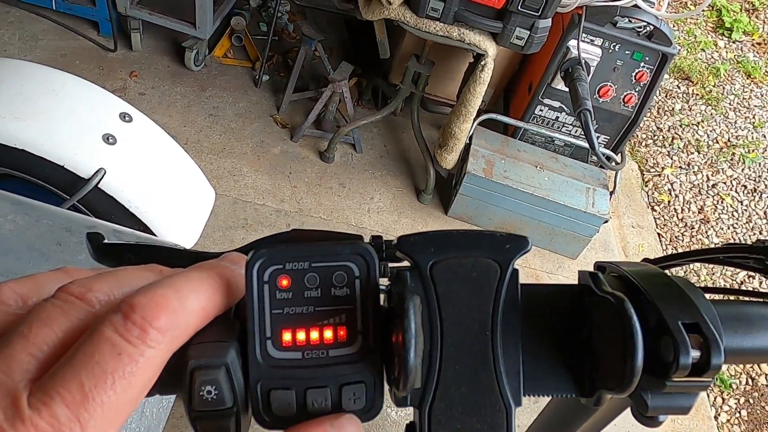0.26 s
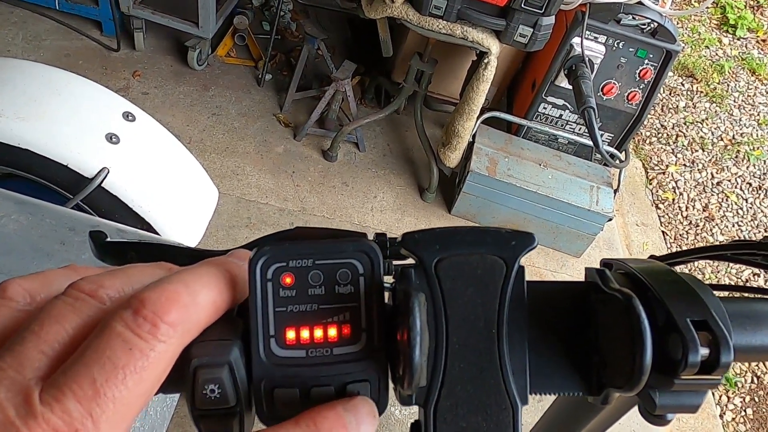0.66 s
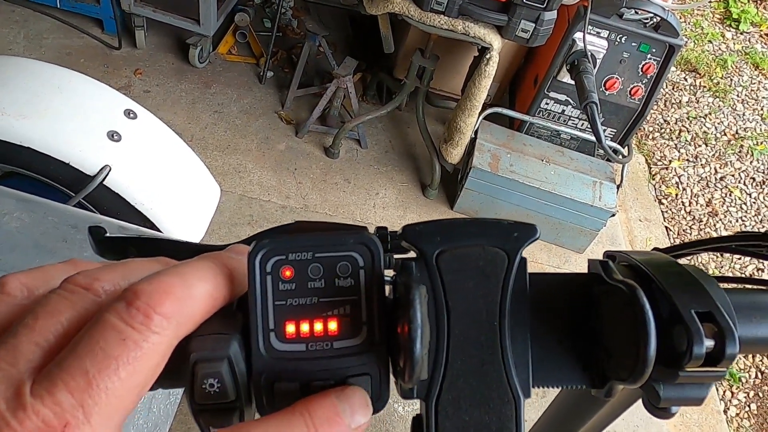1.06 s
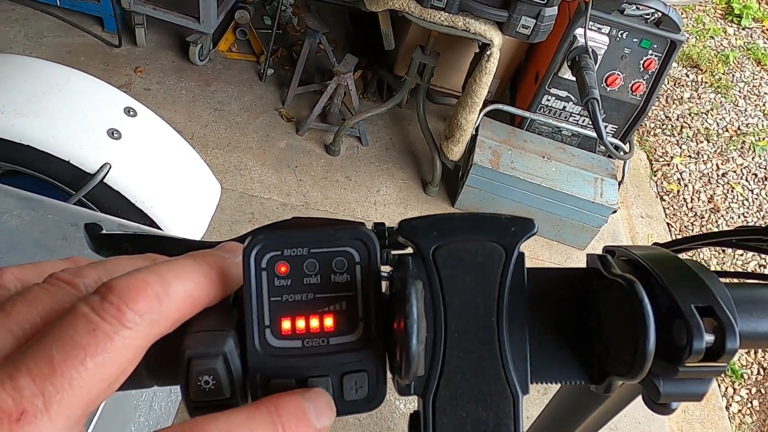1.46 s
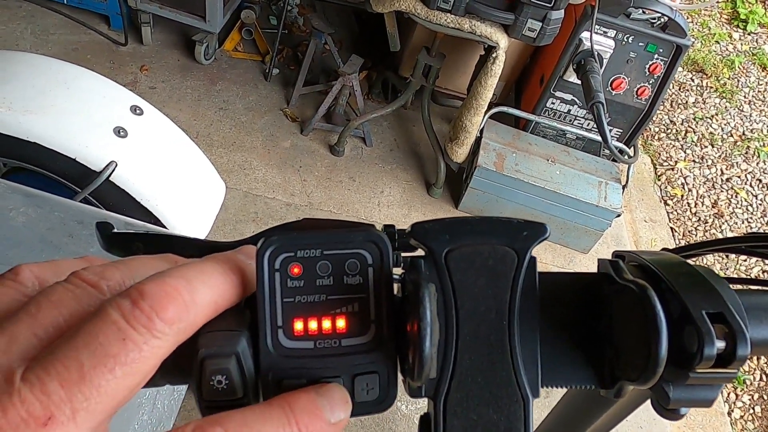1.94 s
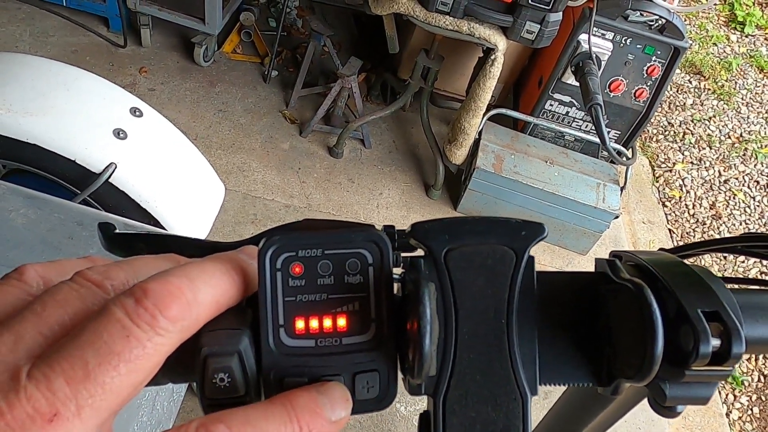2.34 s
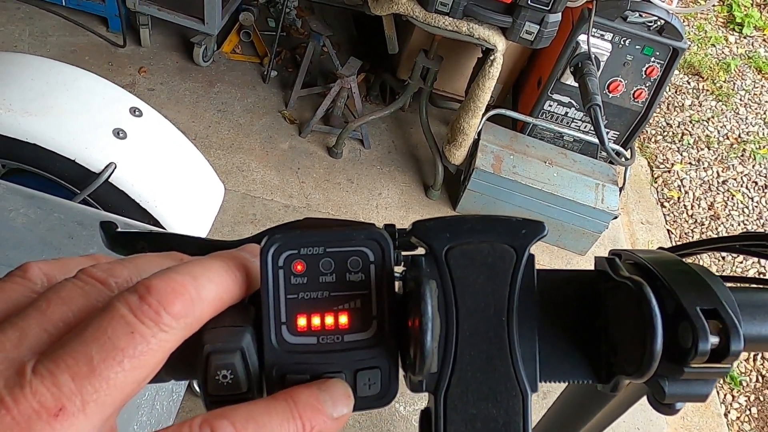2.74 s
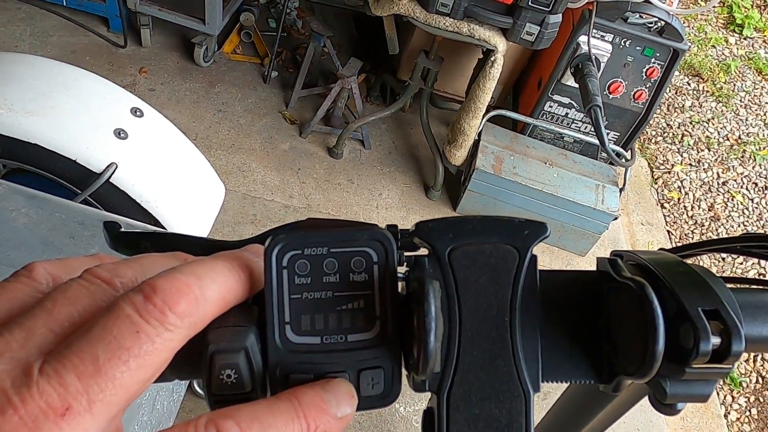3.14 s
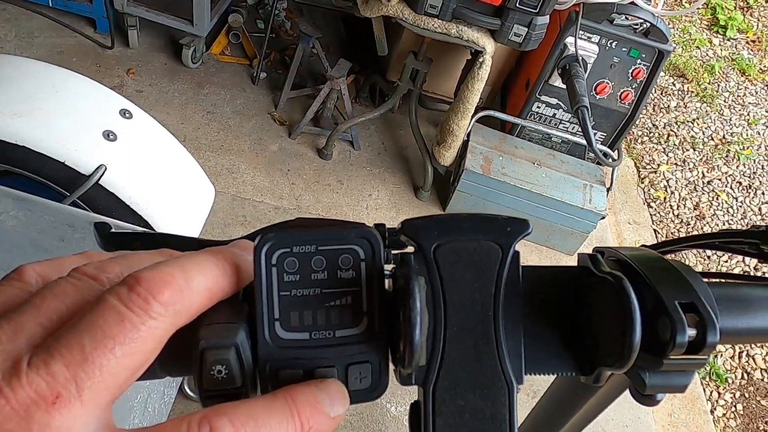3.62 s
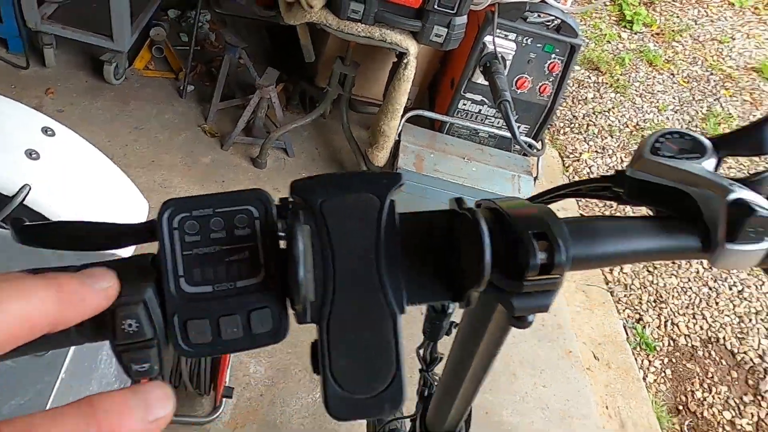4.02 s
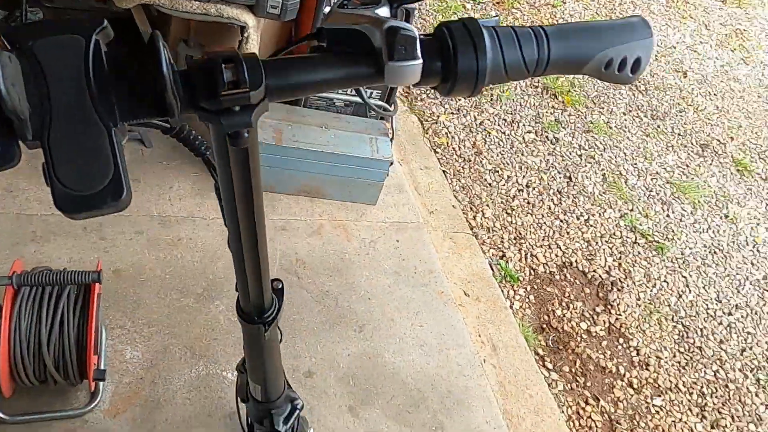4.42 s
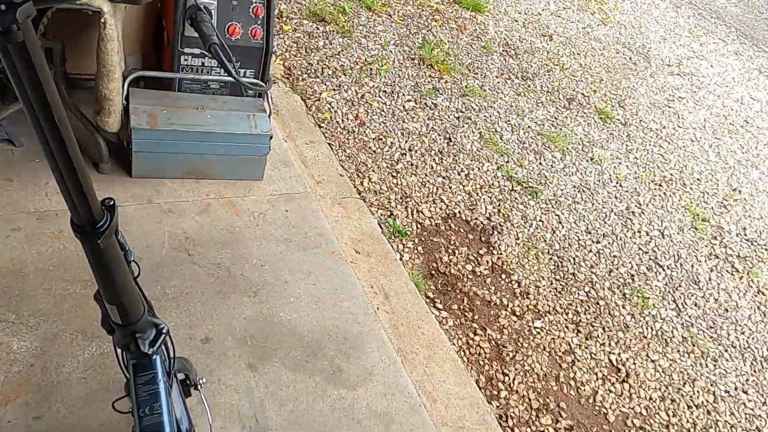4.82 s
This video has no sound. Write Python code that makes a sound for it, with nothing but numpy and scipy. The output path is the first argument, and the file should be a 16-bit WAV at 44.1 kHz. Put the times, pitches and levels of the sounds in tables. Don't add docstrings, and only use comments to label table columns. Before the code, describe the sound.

Close to the microphone in an open garage, a plastic switch snaps crisply at about 1.8 seconds and again at 3.6, each with a tiny hard ring and short room reflection. Small birds cheep, trill and whistle faintly outside throughout, over a low unsteady traffic hum. Near the end come soft rustling, tiny taps and louder chirps.

```python
import sys
import numpy as np
from scipy import signal
from scipy.fft import rfft, irfft
from scipy.io import wavfile
from scipy.ndimage import uniform_filter1d

SR = 44100
rng = np.random.default_rng(int(sys.argv[2]) if len(sys.argv) > 2 else 0)


def magnitude_from_level(level_db):
    exponent = np.asarray(level_db, float) / 20
    return 10 ** exponent


def store_wav(level_fs):
    pcm = np.round(np.clip(np.atleast_2d(level_fs), -1, 1) * 32767)
    wavfile.write(sys.argv[1], SR, pcm.T.astype(np.int16))


N = 223313
T = np.arange(N) / SR
HZ = np.maximum(np.arange(N // 2 + 1) * SR / N, 1)


def on_log(table):
    hz, value = np.transpose(table)
    return np.interp(np.log(HZ), np.log(hz), value)


def shaped(gain):
    return irfft(rfft(rng.standard_normal(N)) * gain, N)


def unit(x):
    return x / np.sqrt(np.mean(x ** 2))


def walk(rate_hz):
    k = int(SR / rate_hz)
    steps = np.repeat(rng.standard_normal(N // k + 1), k)
    return 1.9 * uniform_filter1d(uniform_filter1d(steps, k), k)[:N]


def echoes(x, t60_s, gap_s, treble_share):
    t = np.arange(SR // 2) / SR
    noise = rng.standard_normal((2, len(t))) + 0.6 * rng.standard_normal(len(t))
    low = signal.sosfilt(signal.butter(2, 6000, fs=SR, output="sos"), noise)
    tail = low * 1000 ** (-t / t60_s) + (noise - low) * 1000 ** (-t / t60_s / treble_share)
    tail = tail * np.clip(t / gap_s, 0, 1)
    tail = tail / np.sqrt(np.mean(np.sum(tail ** 2, axis=1)))
    return signal.fftconvolve(x[None], tail, axes=1)[:, :N]


# (pitch_hz, level_db)
LEFT_SHADE = [(300, -10), (2000, 14.5), (4000, 2), (8000, 4.5), (12000, -20)]


def ports(x, pan_db):
    lag_samples = 2 * np.clip((8600 - HZ) / 1600, 0, 1)
    late = np.exp(-2j * np.pi * HZ / SR * lag_samples)
    left = irfft(rfft(x) * late * magnitude_from_level(on_log(LEFT_SHADE) + pan_db / 2), N)
    return np.array([left, x * magnitude_from_level(-pan_db / 2)])


# (pitch_hz, press_db, release_db, t60_s)
BUTTON = [(1160, -17.5, -14.5, 0.04), (1150, -39, -38, .2), (1330, -27, -30, .02),
          (1740, -21.5, -30, 0.027), (2078, -17.5, -37, 0.019), (3330, -15.5, -10, 0.017),
          (3900, -36, -15, 0.015), (4730, -10, -11, 0.026), (5200, -12, -13, .014), (2750, -6, 0.5, 0.0047),
          (3700, -8, 5, 0.0055), (4900, -5, 7, 0.006), (6100, 14.5, 7.5, 0.0023), (8420, 10, -22, 0.0022),
          (10200, -12, -28, .003), (12500, -22, -34, .003), (14500, -15, -32, 0.0023)]
# (start_s, peak_db, release_0_to_1, left_minus_right_db, ring_share_of_t60)
SNAPS = [(1.7712, -14.5, 0, -6, 1), (3.5985, -49, 0.75, 1, 0.5), (3.609, -15, 1, -7, 1.1),
         (3.6095, -18.5, .9, -7, 1), (3.6114, -30, 1, 3, 1), (4.189, -41, 0.5, 1, .7),
         (4.1915, -43, 0.8, 1, .7), (4.1943, -32, .8, -4, 0.5), (4.203, -38, .7, -3, 0.5),
         (4.2145, -47, .7, 0, .5), (4.5055, -44, 0.5, 1, 1), (4.8055, -52, .4, 0, .5)]


def button():
    dome_flip_s, dome_spread_s = 0.00026, 0.00027
    light_tap_db, light_tap_hz = 13, 2000
    out, t = np.zeros((2, N)), np.arange(SR // 10) / SR
    hz, press_db, release_db, t60_s = (column[:, None] for column in np.transpose(BUTTON))
    late = np.maximum(t - dome_spread_s * np.log2(hz / hz.min()), 0)
    rise = 1 - np.exp(-(late / dome_flip_s) ** 2)
    small_body = signal.butter(2, 855, "high", fs=SR, output="sos")
    for s, db, release, pan_db, ring in SNAPS:
        mode_db = press_db + release * (release_db - press_db)
        mode_db = mode_db - light_tap_db * max(1 - ring, 0) * (hz < light_tap_hz)
        modes = magnitude_from_level(mode_db) * np.sin(2 * np.pi * hz * late) * 1000 ** (-late / t60_s / ring)
        snap = signal.sosfilt(small_body, -(modes * rise).sum(axis=0))
        if release > .85:
            snap = -snap
        hit, first = np.zeros(N), int(s * SR)
        hit[first:first + len(t)] = snap * magnitude_from_level(db) / np.abs(snap).max()
        out += ports(hit, pan_db)
    return out + magnitude_from_level(-15.5) * echoes(out.mean(axis=0), t60_s=0.27, gap_s=0.0069, treble_share=0.25)


# (start_s, pitch_hz, level_db, t60_s)
THUMPS = [
    (3.6317, 320, -26.5, 0.016),
    (5.014, 417, -42, 0.02),
    (5.031, 289, -42.5, 0.05),
]


def knocks():
    out = np.zeros((2, N))
    for s, hz, db, t60_s in THUMPS:
        late = np.maximum(T - s, 0)
        push = 1 - np.exp(-late / .0015)
        out += ports(magnitude_from_level(db) * np.sin(2 * np.pi * hz * late) * 1000 ** (-late / t60_s) * push, 9.9)
    return out


def note(s, length, start_hz, end_hz, db, depth_hz, peak, rise_db, fall_db, arch_hz=0):
    peak_hz = start_hz + peak * (end_hz - start_hz) + arch_hz
    return [(s, start_hz, db - rise_db, depth_hz),
            (s + peak * length, peak_hz, db, depth_hz),
            (s + length, end_hz, db - fall_db, depth_hz)]


def sing(notes, warble, flutter, edge_s):
    out = np.zeros(N)
    for rows in notes:
        s, hz, db, depth_hz = np.transpose(rows)
        span = slice(int(max(s[0], 0) * SR), min(int(s[-1] * SR), N))
        t = T[span]
        pitch = np.interp(t, s, hz) + np.interp(t, s, depth_hz) * warble[span]
        phase = 2 * np.pi * np.cumsum(pitch) / SR
        edges = np.sin(np.pi / 2 * np.clip(np.minimum(t - s[0], s[-1] - t) / edge_s, 0, 1)) ** 2
        tone = np.sin(phase) + magnitude_from_level(-35) * np.sin(2 * phase)
        out[span] += np.sqrt(2) * magnitude_from_level(np.interp(t, s, db)) * edges * flutter[span] * tone
    return out


# (delay_s, length_s, start_hz, end_hz, level_db)
CHIRP = [(.002, 0.049, 6700, 5310, -21), (.01, 0.032, 3910, 4042, -11.5), (0.019, 0.057, 4600, 4630, -3),
         (0.04, 0.036, 3895, 3800, 2), (.06, .025, 2800, 3000, -20), (.07, 0.027, 3250, 3323, 0.5)]
# (start_s, level_db, stretch)
CHIRPS = [
    (.4, -42, 1.0),
    (4.503, -40, 1.08),
]
# (start_s, length_s, start_hz, end_hz, level_db)
SHRILL = [
    (4.538, 0.0394, 5470, 5050, -42),
    (4.553, 0.0214, 4297, 4953, -35),
]


def near_cheep_notes():
    shape = dict(depth_hz=230, peak=.45, rise_db=6, fall_db=8)
    notes = [note(*row, **shape) for row in SHRILL]
    for s, db, stretch in CHIRPS:
        for delay, length, start_hz, end_hz, part_db in CHIRP:
            notes.append(note(s + delay * stretch, length * stretch, start_hz, end_hz,
                              db + part_db, arch_hz=300, **shape))
    return notes


# (start_s, length_s, top_hz, end_hz, level_db)
ARCHES = [
    (1.079, 0.12, 4250, 3466, -60),
    (2.846, .14, 4210, 3370, -57),
]
# (start_s, length_s, start_hz, end_hz, level_db)
PEEPS = [(.078, 0.047, 3500, 2450, -68), (.418, 0.037, 2890, 2950, -71.5), (1.09, 0.11, 4590, 4550, -67),
         (1.045, 0.043, 4600, 4150, -74), (1.085, 0.12, 5630, 6340, -73), (2.81, 0.08, 4900, 5430, -78),
         (3.14, 0.07, 4100, 3500, -75), (2.902, .03, 2900, 3150, -60), (2.945, .03, 2950, 3100, -65),
         (2.885, .04, 3800, 3500, -62), (3.39, .06, 5000, 4800, -73), (4.4, .1, 5700, 5300, -73),
         (.41, .04, 5900, 5200, -62), (.6, .08, 2950, 2900, -76), (2.48, .03, 3050, 3050, -72),
         (4.645, 0.14, 5400, 5000, -68), (4.98, 0.079, 4120, 4200, -59), (4.985, 0.089, 4990, 4840, -58),
         (4.93, 0.093, 5740, 6140, -66)]
# (start_s, level_db)
LEADS = [(1.379, -75.5), (2.169, -76), (3.397, -77)]


def far_cheep_notes():
    notes = []
    leap_hz, leap_share, leap_db, sag_db = 1450, .18, 6, 3
    for s, length, top_hz, end_hz, db in ARCHES:
        share = np.array([0, leap_share, .5, 1])
        pitch = np.interp(share, [0, leap_share, 1], [top_hz - leap_hz, top_hz, end_hz])
        level = db - np.array([1.6 * leap_db, leap_db, 0, sag_db])
        depth_hz = 300 * np.array([.1, 0.27, 0.96, 1.0])
        notes.append(np.transpose([s + share * length, pitch, level, depth_hz]))
    leads = [(s, 0.097, 6120, 5200, db) for s, db in LEADS]
    return notes + [note(*row, depth_hz=300, peak=.3, rise_db=4, fall_db=6) for row in [*PEEPS, *leads]]


# (start_s, length_s, middle_hz, level_db)
TRILLS = [(-.05, 0.24, 4345, -72.5), (0.672, 0.18, 4117, -57.5), (1.404, 0.2, 4010, -55.5),
          (1.722, 0.11, 3854, -56.5), (2.1, 0.1, 4280, -71.5), (2.193, 0.17, 4145, -57),
          (3.414, 0.19, 4094, -56.5), (4.337, 0.17, 4170, -54.5), (4.658, 0.16, 4160, -57.5)]


def trills():
    sag_hz = 520
    bend = np.array([[1, 1, 0.94, 0.773], [1, 0.99, 0.99, .95], [1, 0.98, 0.96, 0.75]])
    notes = []
    for s, length, hz, db in TRILLS:
        rows = note(s, length, hz + sag_hz / 2, hz - sag_hz / 2, db,
                    depth_hz=660, peak=0.4, rise_db=5, fall_db=11)
        notes.append(np.array(rows) * bend)
    wobble = np.sin(2 * np.pi * np.cumsum(76.5 * (1 + 0.18 * walk(25))) / SR) + 0.28 * walk(300)
    return sing(notes, wobble, magnitude_from_level(1.7 * walk(120)), edge_s=0.0076)


# (start_s, length_s, start_hz, end_hz, level_db)
WHISTLES = [(0.325, 0.047, 3510, 2910, -71.5), (1.323, 0.071, 4140, 3190, -68.5),
            (1.973, 0.038, 2950, 3210, -82), (2.002, 0.026, 3250, 4040, -75), (1.063, .03, 2750, 3300, -68),
            (1.132, .02, 2850, 3200, -65), (1.158, .045, 3250, 2650, -66), (2.824, .04, 2450, 2560, -78.5),
            (2.946, 0.022, 2500, 2540, -66), (2.468, 0.021, 4630, 5140, -70.5),
            (2.478, 0.05, 4185, 2760, -61.5), (2.668, 0.022, 5060, 5100, -76.5),
            (2.677, 0.058, 4290, 2840, -66), (2.976, 0.059, 3295, 2780, -54.5),
            (3.011, 0.1057, 2770, 2839, -64.5), (3.032, 0.047, 6600, 6400, -84),
            (3.126, 0.034, 5200, 5300, -71), (3.231, 0.11, 3040, 4240, -71.5),
            (3.686, 0.023, 4700, 4160, -70), (3.747, 0.049, 5720, 6100, -80),
            (3.748, 0.06, 7400, 7240, -74), (3.865, 0.037, 3580, 4340, -78), (3.91, 0.037, 4380, 3830, -83),
            (4.218, 0.054, 4320, 4710, -64), (4.275, 0.07, 4650, 4520, -60.5),
            (4.648, 0.026, 5400, 5320, -45.5), (4.725, 0.018, 5300, 5230, -53),
            (4.737, 0.018, 4700, 4750, -51), (4.764, 0.017, 5300, 5540, -56),
            (4.687, 0.016, 5300, 5274, -45), (5.002, 0.086, 4520, 4640, -50)]


def whistle_notes():
    held, fast = [], []
    for row in WHISTLES:
        s, length, start_hz, end_hz, db = row
        group = fast if abs(end_hz - start_hz) / length > 9000 else held
        group.append(note(*row, depth_hz=50, peak=.55, rise_db=3, fall_db=1))
    return held, fast


def birds():
    cycle = 2 * np.pi * np.cumsum(170.65 * (1 + 0.26 * walk(40))) / SR
    warble = 0.85 * np.sin(cycle) + .5 * np.tanh(walk(400))
    throb = 1 + .4 * np.cos(cycle)
    rasp, shimmer = walk(2500), magnitude_from_level(1.5 * walk(200))
    near = sing(near_cheep_notes(), warble, (throb + .16 * rasp) * shimmer, edge_s=0.011)
    far = sing(far_cheep_notes(), warble, (throb + .06 * rasp) * shimmer, edge_s=0.011)
    trill = trills()
    quiver = magnitude_from_level(1.5 * walk(80))
    whistles, sweeps = (sing(notes, warble, quiver, edge_s=0.008) for notes in whistle_notes())
    to_walls = near * magnitude_from_level(1) + far * magnitude_from_level(6) + trill + whistles * magnitude_from_level(-2) + sweeps * magnitude_from_level(4)
    yard = echoes(to_walls, t60_s=0.32, gap_s=0.001, treble_share=0.36)
    direct = magnitude_from_level(2.5) * (near + far) + magnitude_from_level(-4.5) * (trill + sweeps) + magnitude_from_level(-1.5) * whistles
    return ports(direct, 0.001) + yard


# (loudest_s, rise_s, fall_s, level_db)
BRUSH = [(.11, .05, .06, -76), (1.75, .04, .1, -76), (1.82, .1, .1, -70), (3.72, .1, .3, -78),
         (4.0, .5, .6, -64.5), (4.2, .06, .1, -69), (4.32, .3, .5, -70), (4.55, .35, .15, -67),
         (5.0, .07, .5, -70)]
# (pitch_hz, level_db per Hz)
BRUSH_COLOUR = [(150, 6), (350, 1.5), (800, -21), (1150, 1), (1440, -11.5), (2310, -7), (2900, -11),
                (4900, -8.5), (15000, -42.5)]


def brush():
    colour = magnitude_from_level(on_log(BRUSH_COLOUR))
    strokes = 0
    for s, rise_s, fall_s, db in BRUSH:
        away = np.maximum((s - T) / rise_s, (T - s) / fall_s)
        strokes = strokes + magnitude_from_level(db - 22 * away)
    grain = magnitude_from_level(1.5 * walk(90))
    shared = ports(unit(shaped(colour)), 1.0)
    separate = np.array([unit(shaped(colour)), unit(shaped(colour))])
    return strokes * grain * (shared + 1.98 * separate)


def pair(gain, alike):
    mid = shaped(gain * np.sqrt(1 + alike))
    side = shaped(gain * np.sqrt(1 - alike))
    return np.array([mid + side, mid - side])


# (pitch_hz, width_hz, level_db)
DRONE = [
    (136, 24, 0.5),
    (162.1, 27, 3.5),
    (198.7, 32, -6.5),
]


def traffic_drone(load_db, alike):
    peaks = sum(magnitude_from_level(db) / (1 + ((HZ - hz) / width * 2) ** 2) for hz, width, db in DRONE)
    return unit(pair(peaks, alike)) * magnitude_from_level(load_db + 1 + np.array([[-1.2], [.8]]))


# (time_s, load_db)
TRAFFIC = [(0.0, -71), (0.21, -59), (1.39, -57), (1.42, -66), (1.54, -48), (1.59, -62), (2.56, -54),
           (2.65, -48.5), (2.76, -58.5), (2.82, -47.5), (2.89, -56.5), (4.07, -59.5), (4.23, -51),
           (4.37, -61), (4.67, -56), (4.76, -66), (4.95, -59.5), (5.06, -57.5)]
# (pitch_hz, level_db per Hz)
AIR = [(14, -44.5), (22, -10.5), (60, -10.5), (100, -12.5), (260, -20.5), (370, -23), (600, -30),
       (1200, -28.5), (2500, -39), (3900, -31), (5700, -43), (7500, -47), (8700, -56), (15500, -60) ]
# (pitch_hz, likeness_0_to_1)
ALIKE = [(25, .45), (60, .1), (130, 0.45), (300, .5), (700, .35), (1500, 0.6), (3000, 0.23)]


def air():
    load_db = np.interp(T, *np.transpose(TRAFFIC))
    rumble_db = 0.32 * (load_db - load_db.mean()) + 3.5 * walk(11.0)
    truck_db = 8 * (np.clip((3.02 - T) / 0.41, 0, 1) - .7)
    colour, alike = magnitude_from_level(on_log(AIR)), np.clip(on_log(ALIKE), 0, 1)
    swell_db, out = .5 * walk(0.75), 0
    for hz in 22 * 2 ** np.arange(0, 10, .5):
        band = colour * np.cos(np.pi * np.clip(np.log2(HZ / hz), -.5, .5))
        gust_db = rumble_db + truck_db * (hz > 50) if hz < 130 else swell_db
        out = out + magnitude_from_level(gust_db + 1.6 * walk(5.88)) * pair(band, alike)
    return unit(out) * magnitude_from_level(-58) + traffic_drone(load_db, alike)


def scene():
    return button() + knocks() + birds() + brush() + air()


def top_cut(x):
    return signal.sosfilt(signal.butter(12, 16490, fs=SR, output="sos"), x)


def record(dry):
    return top_cut(dry)


dry = scene()
out = record(dry)
store_wav(out)
```